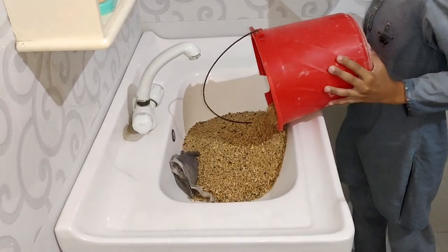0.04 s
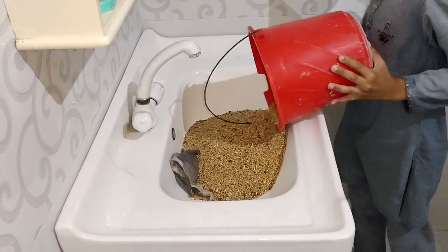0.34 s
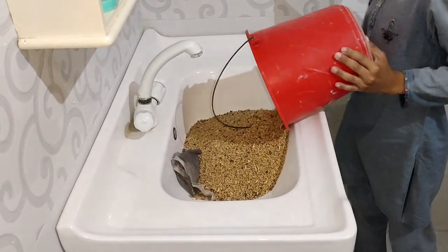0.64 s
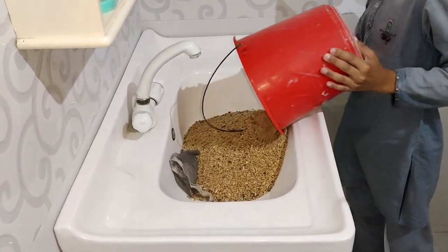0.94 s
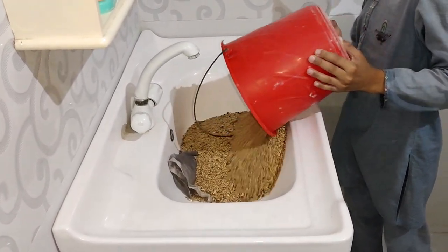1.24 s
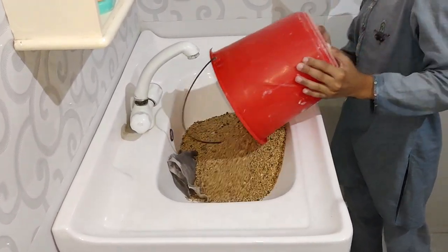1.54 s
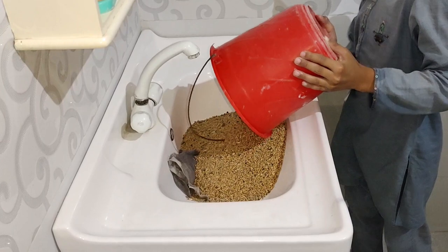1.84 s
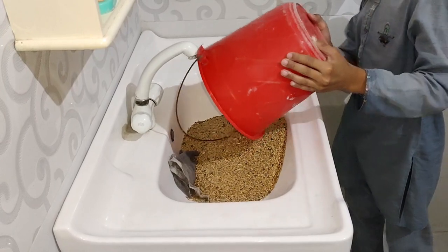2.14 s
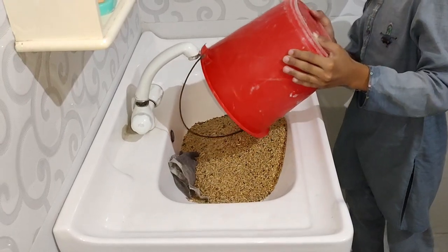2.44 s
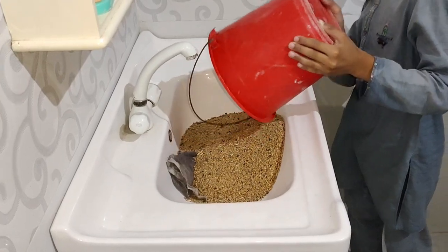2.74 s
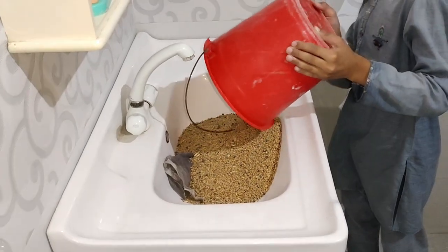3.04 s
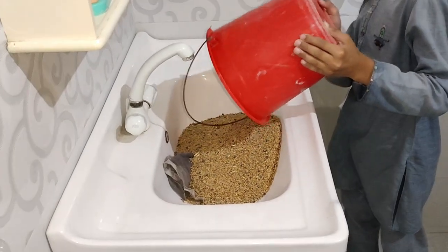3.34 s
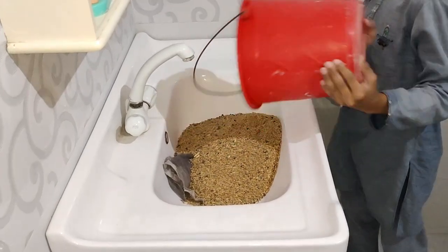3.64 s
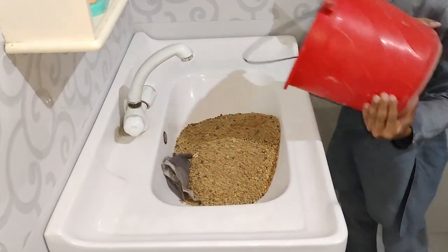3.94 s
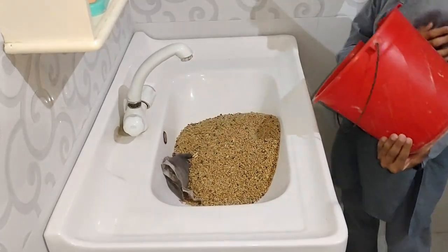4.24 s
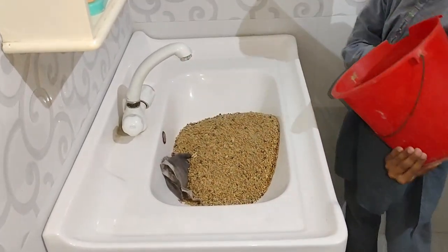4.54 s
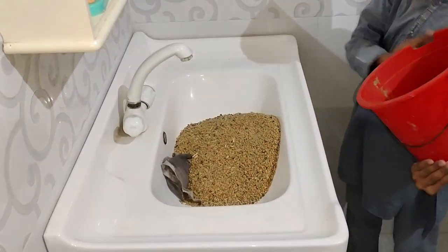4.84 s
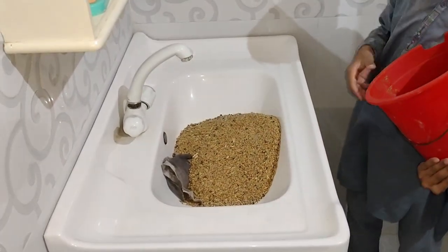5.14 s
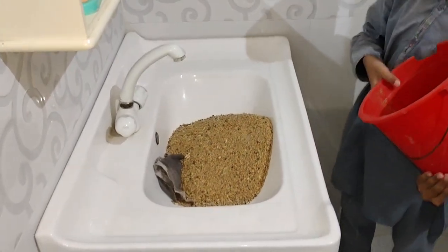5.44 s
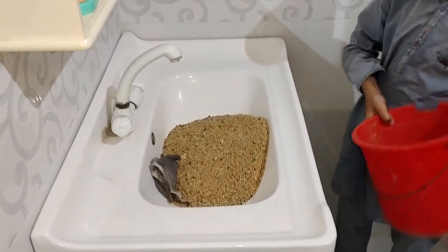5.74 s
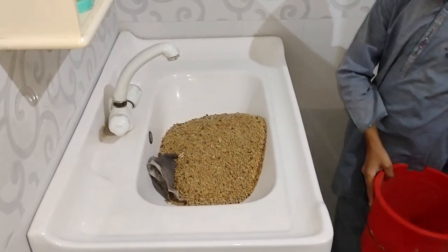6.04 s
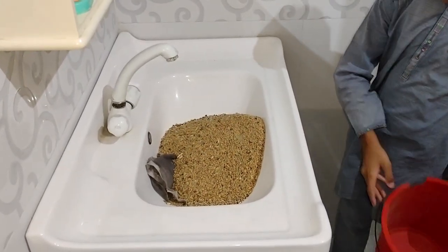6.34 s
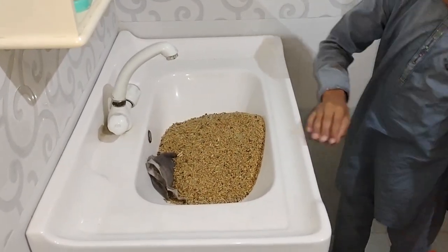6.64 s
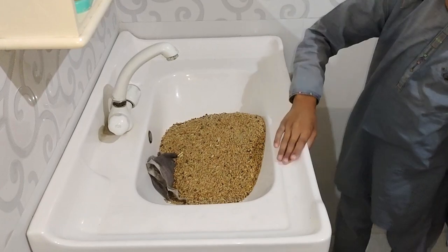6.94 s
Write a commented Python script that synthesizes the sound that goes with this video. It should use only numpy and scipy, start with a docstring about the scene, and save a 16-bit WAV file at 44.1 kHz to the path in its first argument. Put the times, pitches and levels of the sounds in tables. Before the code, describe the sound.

Grain rushes from a plastic bucket into a ceramic basin, then the bucket is tapped, knocked and set down in an echoing washroom.

```python
"""A ringing tiled washroom; a two-port stereo microphone hears more of the walls than of the direct sound.
Grain slides from a plastic bucket onto a heap in a ceramic basin, its colliding kernels ringing the
bucket. Two clumps drop with a thud and the last kernels are shaken out. The bucket is swung upright,
its wire handle slaps its wall and rattles; it is regripped with a rub and a hoot, then set down.
A hand comes to rest on the basin, which drones briefly."""
import sys
import numpy as np
from scipy import signal
from scipy.fft import rfft, irfft
from scipy.io import wavfile

SR = 44100
rng = np.random.default_rng(int(sys.argv[2]) if len(sys.argv) > 2 else 0)


def materialize(psi):
    """Save the field psi as 16-bit PCM at rate SR to the path in sys.argv[1].

    A 1-D psi becomes a single channel; in a 2-D psi each row is a channel.
    """
    bounded = np.clip(np.atleast_2d(psi).T, -1, 1)
    quanta = np.round(bounded * 32767).astype(np.int16)
    wavfile.write(sys.argv[1], SR, quanta)


N = 317935
TIME = np.arange(N) / SR
FULL_FLOW_DB = -30.5   # the flow that counts as a full stream
# hands sliding on the empty bucket: t/s, level/dB, half-width/s, boom/dB, hiss/dB, hoot/dB, hoot f/Hz
GRIPS = [(3.845, -59, 0.031, 2, 9, -58, 480), (4.607, -42.5, 0.13, 6, -11, -50, 372),
         (4.997, -36.5, 0.026, 0.5, 1.5, -37, 498.6), (5.135, -31, 0.036, -19, -3, -45, 387),
         (5.428, -45, 0.022, -6, -2, -47.5, 497), (5.713, -47, 0.075, -27, 7.5, -54.5, 512),
         (5.88, -52.5, 0.036, -5, 3, -59, 502), (6.19, -43.5, 0.068, -5, 6, -51.5, 446),
         (6.472, -38.5, 0.039, 0, -2, -52.5, 453), (6.73, -48, 0.049, -29, -3.5, -59, 523)]


def from_db(db):
    """Decibels to gain."""
    return 10 ** (np.asarray(db) / 20)


def at_hz(points, hz):
    """Read a table on a log-frequency axis."""
    f, value = np.transpose(points)
    return np.interp(np.log(np.maximum(hz, 1)), np.log(f), value)


def unit_energy(x):
    """Scale a response so that it passes white noise at the same power."""
    return x / np.sqrt(np.sum(x ** 2, axis=-1, keepdims=True) + 1e-20)


def through(x, response):
    """Convolve; the result is channels x N."""
    return signal.fftconvolve(np.atleast_2d(x), np.atleast_2d(response), axes=-1)[:, :N]


def add(track, s, sound):
    """Lay a sound into a track at time s."""
    start = round(s * SR)
    track[start:start + len(sound)] += sound[:N - start]


def swell(s, rise_s, fall_s):
    """Bell-shaped stroke of height 1 that peaks at time s."""
    return np.exp(-((TIME - s) / np.where(TIME < s, rise_s, fall_s)) ** 2 / 2)


def held(start_s, end_s, fade_s):
    """Fade in, hold at 1 from start to end, fade out."""
    return np.clip(1 + np.minimum(TIME - start_s, end_s - TIME) / fade_s, 0, 1)


def wander(per_s):
    """Slow drift: random values joined by straight lines."""
    knots = TIME[::SR // per_s]
    return np.interp(TIME, knots, rng.standard_normal(len(knots)))


def colour(spectrum, size=8192):
    """Causal (minimum-phase) response with the given spectrum."""
    gain = from_db(at_hz(spectrum, np.fft.rfftfreq(size, 1 / SR)))
    cepstrum = irfft(np.log(gain))
    cepstrum[1:size // 2] *= 2
    cepstrum[size // 2 + 1:] = 0
    return irfft(np.exp(rfft(cepstrum)))


def ring(x, hz, width_hz):
    """Pass a sound through one resonance."""
    return signal.lfilter(*signal.iirpeak(hz, hz / width_hz, fs=SR), x)


def resonant(x, peaks):
    """Add resonances on top of a sound."""
    return x + sum(from_db(db) * ring(x, hz, width_hz) for hz, width_hz, db in peaks)


def body(spectrum, peaks=()):
    """Response of an object: a broad colour with resonances on it; energy 1."""
    return unit_energy(resonant(colour(spectrum), peaks))


def voiced(x, boom_db, hiss_db, boom_hz=680, hiss_hz=4600):
    """Split into hollow bass, middle and hiss, and weigh the outer two."""
    def crossover(v, hz, kind):
        sos = signal.butter(2, hz, kind, fs=SR, output="sos")
        return signal.sosfilt(np.vstack([sos, sos]), v + 1e-18)
    boom, upper = crossover(x, boom_hz, "low"), crossover(x, boom_hz, "high")
    middle, hiss = crossover(upper, hiss_hz, "low"), crossover(upper, hiss_hz, "high")
    return from_db(boom_db) * boom + middle + from_db(hiss_db) * hiss


def contacts(per_s, spread_db):
    """Random tiny impacts of uneven size; rms 1."""
    sizes = from_db(spread_db * np.minimum(rng.exponential(1, N), 5)) * rng.choice([-1, 1], N)
    chance = np.clip(per_s / SR, 1e-4, 1)
    return sizes / np.std(sizes) * (rng.random(N) < chance) / np.sqrt(chance)


def chatter(decay_s, size=8192):
    """A dying run of contacts that excites all frequencies about evenly; energy 1."""
    envelope = np.exp(-TIME[:size] / decay_s)
    burst = rng.standard_normal(size) * envelope
    for _ in range(2):
        flattened = irfft(np.exp(1j * np.angle(rfft(burst))))
        burst = flattened * np.sqrt(envelope)
    return unit_energy(burst)


def room_tone(level_db=-58.5):
    """Quiet rumble, alike at both ports, with unrelated hiss on top."""
    # colour of the quiet room: f/Hz, level/dB
    air = [(30, -33), (60, -48), (100, 1), (150, -10), (220, -7), (330, -22), (460, -29.5), (700, -23),
           (1500, -22), (3200, -27.5), (6000, -33), (15500, -38.5)]
    mid, side = through(rng.standard_normal((2, N)), body(air))
    side = signal.sosfilt(signal.butter(1, 900, "high", fs=SR, output="sos"), side)
    return from_db(level_db) * (mid + side * [[1], [-1]])


def tiled_room(build_s=0.00022, treble_loss_db=-4.5, modes_db=-29.5, size=65536):
    """Stereo response of the washroom: a diffuse tail that dies band by band, plus long low notes."""
    # reverberation time between the tiles: f/Hz, t60/s
    decay = [(80, 0.1), (180, 1.23), (320, 1.36), (600, 1.12), (1500, 0.84), (3000, 0.83), (5000, 0.6),
             (10000, 0.4), (15000, 0.31)]
    # likeness of the reverberation at the two ports: f/Hz, correlation
    likeness = [(100, 1), (350, 0.64), (700, 0.79), (1300, -0.44), (2500, -0.15), (15000, -0.8)]
    # cavities of bucket and basin, and the lowest room notes: f/Hz, level/dB, t60/s
    modes = [(103.6, 6.5, 1), (116.3, 5, 0.59), (151.6, -2.5, 0.346), (268.5, 1.5, 2.02),
             (315.7, -0.5, 1.5), (354.7, 0.5, 1.03), (374, -1, 1.17), (398, -2, 1.3), (428, -1.5, 0.7),
             (694, -6, 2.6)]
    t, hz = TIME[:size], np.fft.rfftfreq(size, 1 / SR)
    mid, side = rfft(rng.standard_normal((2, size)))
    alike = np.clip(at_hz(likeness, hz), -1, 1)
    field = np.sqrt(1 + alike) * mid + np.sqrt(1 - alike) * side * [[1], [-1]]
    edges = np.geomspace(40, SR / 2, 20)
    tail = notes = 0
    for low, high in zip(edges, edges[1:]):
        centre = np.sqrt(low * high)
        band = irfft(field * (hz >= low) * (hz < high)) * from_db(-60 * t / at_hz(decay, centre))
        loss = from_db(at_hz([(3000, 0.034), (10000, treble_loss_db)], centre))
        tail += unit_energy(band) * np.sqrt(2 * (high - low) / SR) * loss
    for f, db, t60 in modes:
        note = np.sin(2 * np.pi * f * t) * from_db(-60 * t / t60)
        notes += from_db(db + modes_db) * unit_energy(note)
    return tail * (1 - np.exp(-t / build_s)) + notes


def basin_drone(pitch_hz=101, waver_hz=2.0, level_db=-44, flutter_db=2.0):
    """A hand leaning on the basin makes it drone: one low note, wavering in pitch and level."""
    hz = pitch_hz + waver_hz * wander(per_s=20)
    gain = from_db(level_db + flutter_db * wander(per_s=30))
    return gain * held(start_s=7.06, end_s=7.13, fade_s=0.059) * np.sin(2 * np.pi * np.cumsum(hz) / SR)


def rubbing(sleeves_db=-59.5):
    """Skin sticks and slips on the plastic at each grip; sleeves add a steady, brighter brush."""
    # colour of the friction: f/Hz, level/dB
    friction = [(50, -22), (85, -21), (110, -15), (275, -4), (400, 0), (693, -6.5), (986, -8), (1500, -7),
                (2040, -12.5), (2970, -17), (5620, -32), (8740, -33), (15500, -48.5)]
    # wall and air resonances of the empty bucket: f/Hz, width/Hz, gain/dB
    empty_bucket = [(445, 84, -15), (2070, 110, 5.5)]
    wall = through(contacts(per_s=3700, spread_db=-1.0), body(friction, empty_bucket))[0]
    skin = sum(voiced(from_db(db) * swell(s, half_s, half_s) * wall, boom_db, hiss_db)
               for s, db, half_s, boom_db, hiss_db, _, _ in GRIPS)
    cloth = through(contacts(per_s=5600, spread_db=2.5), body(friction))[0]
    arms_moving = held(start_s=3.88, end_s=6.74, fade_s=0.46)
    return skin + from_db(sleeves_db) * arms_moving * voiced(cloth, boom_db=0.5, hiss_db=16.5)


def hoots(width_hz=12.6):
    """Each grip excites one narrow air resonance of the bucket."""
    track = np.zeros(N)
    for s, _, half_s, _, _, db, hz in GRIPS:
        stroke = swell(s, half_s, half_s)
        tone = stroke * ring(rng.standard_normal(N), hz, width_hz)
        track += from_db(db) * unit_energy(tone) * np.linalg.norm(stroke)
    return track


def blows(rows, response, level_db=11.5):
    """Hard, briefly chattering blows on the bucket: the direct sound, and what goes into the room."""
    direct, to_room = np.zeros((2, N))
    for s, db, thump_db, snap_db, chatter_s, room_db in rows:
        blow = from_db(db + level_db) * voiced(chatter(chatter_s), thump_db, snap_db, boom_hz=230)
        add(direct, s, blow)
        add(to_room, s, from_db(room_db) * blow)
    return through([direct, to_room], response)


def bucket_taps():
    """Taps on the upturned bucket give a low knock with a bright click."""
    # the taps: t/s, level/dB, thump/dB, snap/dB, chatter/s, room/dB
    hits = [(2.2195, -9.5, 3, -8, 0.0035, -0.5), (3.089, -20, -6, 8.5, 0.0016, -2.5)]
    # colour of the tapped plastic: f/Hz, level/dB
    plastic = [(60, -34), (200, 14), (1000, -11.5), (2500, -2), (3200, 3), (4000, -10), (6000, -24),
               (15000, -25)]
    return blows(hits, body(plastic))


def set_down():
    """The bucket's base meets the floor, rings and rocks."""
    # floor contacts: t/s, level/dB, thump/dB, snap/dB, chatter/s, room/dB
    hits = [(6.366, -6.5, -3.5, -1, 0.0032, 0.6), (6.410, -15, -8, -10, 0.0031, -7),
            (6.467, -15, 10, -10, 0.0038, -12)]
    # colour of the base: f/Hz, level/dB
    base = [(50, -37), (100, 0.5), (150, 11), (230, -10), (350, 0), (600, -6.5), (1100, 3.5), (1400, -2),
            (2000, 1.5), (2700, -10), (4000, -18), (6000, -24), (9000, -25), (15000, -41)]
    # its resonance: f/Hz, width/Hz, gain/dB
    base_ring = [(1950, 170, -11)]
    return blows(hits, body(base, base_ring))


def handle_knocks():
    """The wire handle slaps the bucket's wall and fingers catch the rim, ringing the plastic."""
    # slaps and catches: t/s, level/dB, thump/dB, snap/dB, chatter/s, room/dB
    hits = [(4.2893, 12, -1, 3.5, 0.0077, -1), (4.309, 10.5, 9, -16, 0.0072, -15),
            (4.6475, -3.5, 1.5, -2, 0.0031, 0), (4.751, -11, 24.5, 5, 0.0016, -30),
            (4.990, -23, -41, -4, 0.016, 5), (5.047, -13, -12.5, 1.5, 0.0071, 0),
            (5.111, -18, -13, -7, 0.016, -23), (5.128, -16.5, -29, 16.5, 0.0037, -5),
            (5.425, -34, 12, -15, 0.045, 9)]
    # colour of the struck wall: f/Hz, level/dB
    plastic = [(40, -27.5), (65, -30), (100, -0.5), (180, -1), (235, -16), (380, -2), (600, -4), (850, 0),
               (1270, 0), (2200, -0.5), (2800, -1.5), (3700, -10.5), (5000, -16), (6000, -19.5),
               (8800, -23.5), (15000, -37.5)]
    # wall modes rung by a hard blow: f/Hz, width/Hz, gain/dB
    wall_modes = [(800, 30, -1.5), (885, 23, 3), (1090, 6.6, -9), (1520, 34, -9), (1585, 11, -35),
                  (2037, 32, 5.5), (2366, 60, 2), (2610, 41, -16)]
    return blows(hits, body(plastic, wall_modes))


def thuds(level_db=11.5):
    """Clumps of grain drop and the bucket bumps the body: a hollow boom with a crunch on top."""
    # soft impacts: t/s, level/dB, crunch/dB, settling/s
    impacts = [(0.781, -1.5, -5, 0.0097), (0.825, -6, -23, 0.054), (2.222, -8.5, -14, 0.0068),
               (2.2558, 0.5, -9, 0.015), (2.275, -3.5, -10.5, 0.068), (2.352, -14.5, -22, 0.028),
               (4.241, -9, -12.5, 0.13)]
    # colour of a thud: f/Hz, level/dB
    hollow = [(50, -32.5), (80, -22), (104, -5.5), (125, -10.5), (190, -10.5), (270, -1), (330, -1.5),
              (400, 1), (470, -9), (600, -13), (1200, -4.5), (3000, -19), (5500, -37), (9000, -30),
              (15000, -46)]
    track = np.zeros(N)
    for s, db, crunch_db, settle_s in impacts:
        impact = voiced(chatter(settle_s), boom_db=-crunch_db, hiss_db=0)
        add(track, s, from_db(db + crunch_db + level_db) * impact)
    return through(track, body(hollow))[0]


def sliding_grain(flow, trickle_per_s=4000, extra_per_s=22000, draining_s=(1.5, 2.0)):
    """The stronger the flow, the more kernels collide and ring; a trickle stays a fine crackle."""
    # colour of grain on plastic: f/Hz, level/dB
    grain = [(50, -36), (80, -38), (110, -22), (165, -24.5), (250, -18), (420, -10), (620, -15), (1450, -2),
             (2600, -2.5), (3300, -4.5), (5700, -21.5), (8700, -21), (15000, -35)]
    # ring of kernels striking one another: f/Hz, width/Hz, gain/dB
    kernel_ring = [(2840, 650, -5)]
    # wall and air resonances of the full bucket: f/Hz, width/Hz, gain/dB
    full_bucket = [(1165, 43, 3), (1543, 23, -17), (2135, 79, -1)]
    # the same as it drains: f/Hz, width/Hz, gain/dB
    draining_bucket = [(469, 22, 7.5), (1162, 100, -1.5), (2920, 400, -11.5), (3250, 88, 0)]
    strength = np.clip(flow / from_db(FULL_FLOW_DB), 0, 1)
    kernels = contacts(trickle_per_s + extra_per_s * strength, spread_db=3.5)
    kernels = (1 - strength) * kernels + strength * resonant(kernels, kernel_ring)
    full, draining = through(kernels, [body(grain, full_bucket), body(grain, draining_bucket)])
    bare = np.interp(TIME, draining_s, [0, 1])   # the wall rings more freely as the grain leaves it
    return (1 - bare) * full + bare * draining


def spurts():
    """Each shake or swing of the bucket sends a few more kernels along its bare wall."""
    # short slides of the last kernels: t/s, level/dB, rise/s, fall/s, boom/dB, hiss/dB
    slides = [(2.279, -43, 0.055, 0.076, 19, -0.5), (2.575, -44, 0.017, 0.066, 13.5, -2),
              (2.831, -53.5, 0.025, 0.043, 15.5, 6), (3.116, -42.5, 0.042, 0.036, 15.5, 2),
              (3.201, -60.5, 0.023, 0.076, 26, 6), (3.99, -53, .12, .1, 3, -7)]
    flows = [from_db(db) * swell(s, rise_s, fall_s) for s, db, rise_s, fall_s, _, _ in slides]
    grain = sliding_grain(sum(flows))
    return sum(voiced(flow * grain, boom_db, hiss_db)
               for flow, (*_, boom_db, hiss_db) in zip(flows, slides))


def pouring(level_db=2.5, run_out_db_per_s=66, boom_db_per_s=1, boom_follows=0.37, spray_db=8.5):
    """The bucket's boom only partly follows the stream, so a trickle sounds hollower than a gush."""
    # flow of grain over the rim: t/s, level/dB
    stream = [(0.0, -32), (0.02, -36.5), (0.15, -44), (0.3, -40.5), (0.43, -45), (0.62, -43), (0.75, -31),
              (0.92, -35.5), (1.14, -29), (1.41, -34), (1.61, -46.5), (1.7, -40.5), (1.76, -47),
              (1.83, -44), (2.17, -52), (2.2, -49)]
    flow_db = np.interp(TIME, *np.transpose(stream))
    running_out_s = np.maximum(TIME - stream[-1][0], 0)
    flow = from_db(flow_db - run_out_db_per_s * running_out_s)
    emptying_db = 0.5 + boom_db_per_s * TIME   # the boom grows as the bucket empties
    boom_db = emptying_db - (1 - boom_follows) * (flow_db - FULL_FLOW_DB)
    spray = swell(1.45, rise_s=0.3, fall_s=0.3)   # the end of the gush hisses over the heap
    hiss_db = -1.5 + spray_db * spray
    return from_db(level_db) * flow * voiced(sliding_grain(flow), boom_db, hiss_db)


def scene(rustle_direct_db=-4.5, thud_direct_db=-7.0, knock_direct_db=-10.5):
    """Grain and bucket reach the microphone mostly by way of the tiled walls."""
    rustle = pouring() + spurts() + rubbing() + hoots()
    thud = thuds()
    knock, knock_to_room = handle_knocks() + bucket_taps() + set_down()
    direct = (from_db(rustle_direct_db) * rustle + from_db(thud_direct_db) * thud
              + from_db(knock_direct_db) * knock)
    reverberation = through(rustle + thud + knock_to_room, tiled_room())
    return direct + reverberation + basin_drone() + room_tone()


def record(dry, cutoff_hz=15500):
    """Each microphone port has its own colour; peaks over full scale clip and the top is cut."""
    # balance of the two ports: f/Hz, left minus right/dB
    balance = [(110, -1.5), (700, 0.7), (1300, 1.5), (2400, 6.5), (3200, 5.5), (3900, 2.5), (5000, 2),
               (6900, 3), (8800, -10), (10500, -1.5), (12000, 4), (15000, 2)]
    ports = [colour([(hz, side * db / 2) for hz, db in balance]) for side in (1, -1)]
    clipped = np.clip(through(dry, ports), -1, 1)
    return signal.sosfilt(signal.ellip(10, .1, 80, cutoff_hz, fs=SR, output="sos"), clipped)


dry = scene()
out = record(dry)
materialize(out)
```